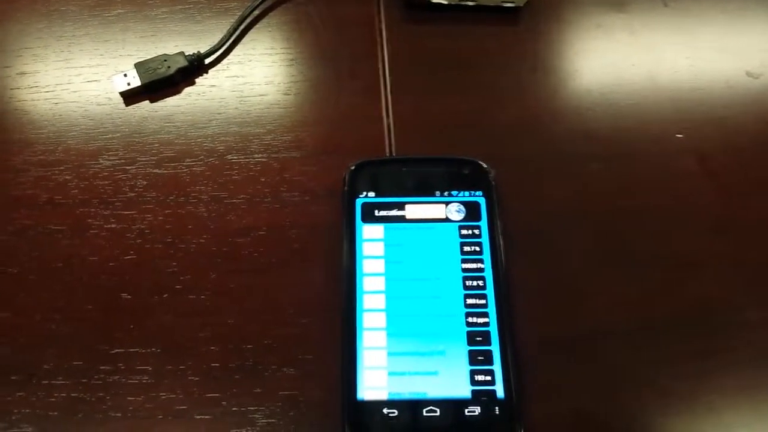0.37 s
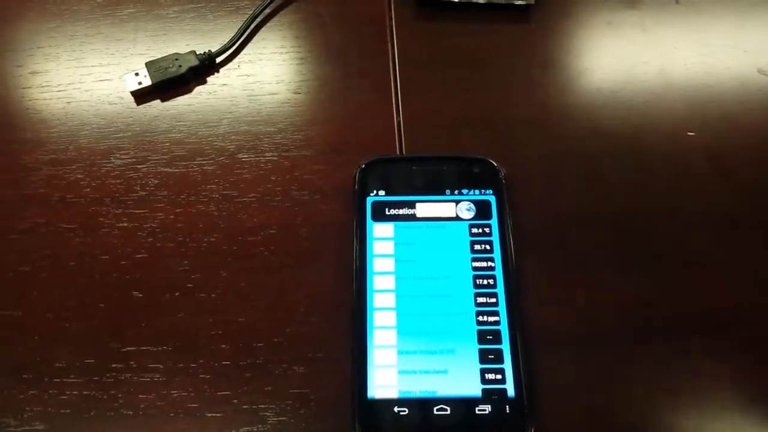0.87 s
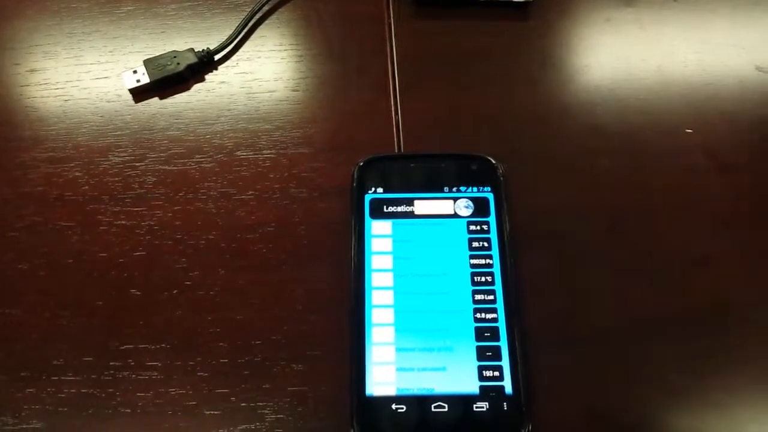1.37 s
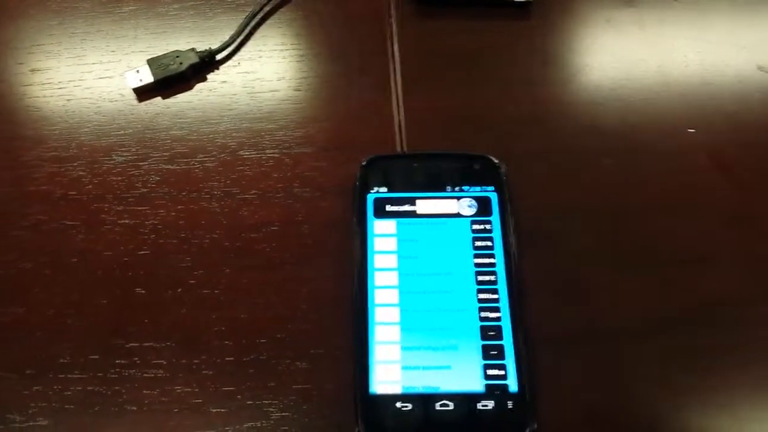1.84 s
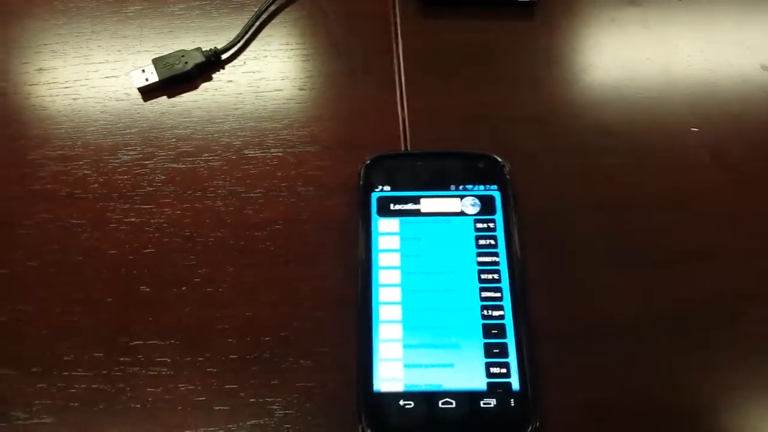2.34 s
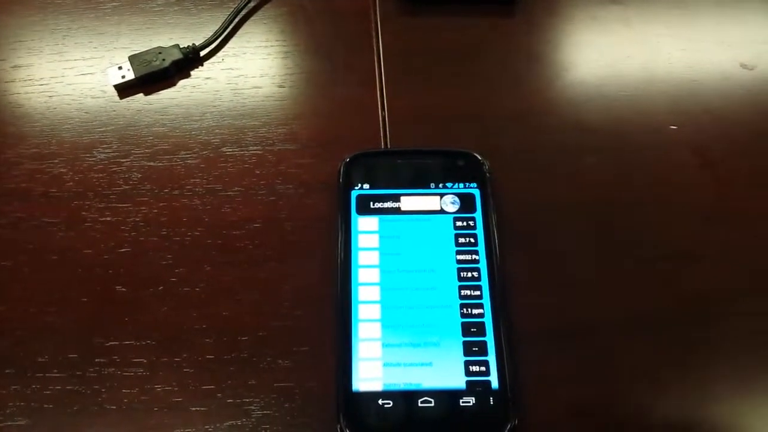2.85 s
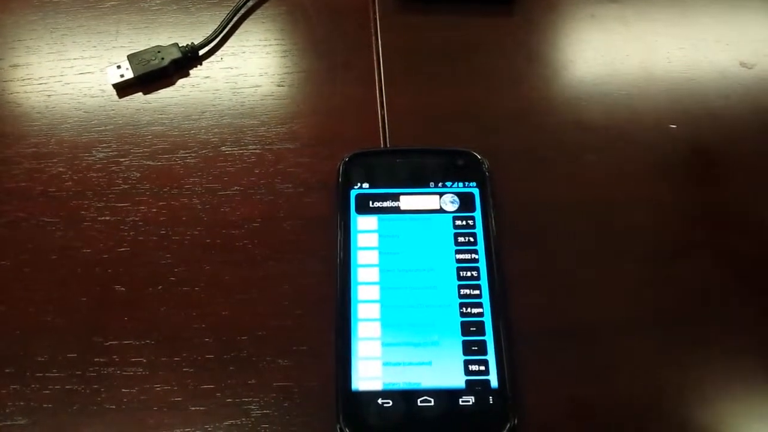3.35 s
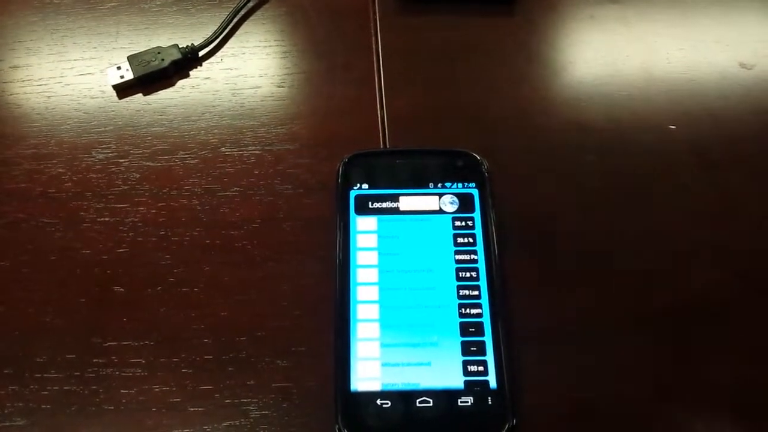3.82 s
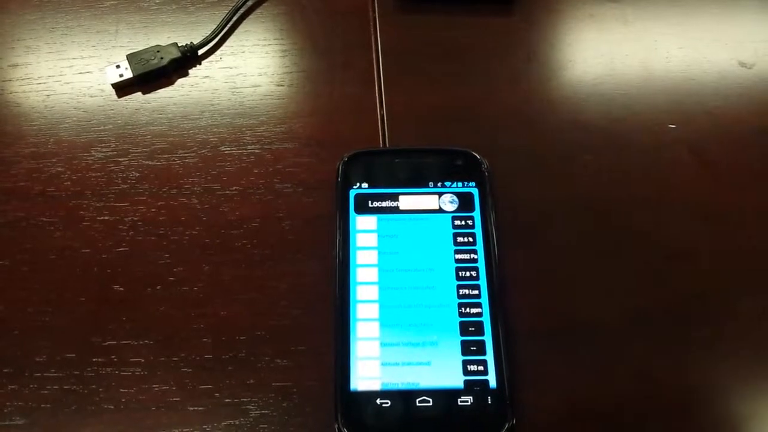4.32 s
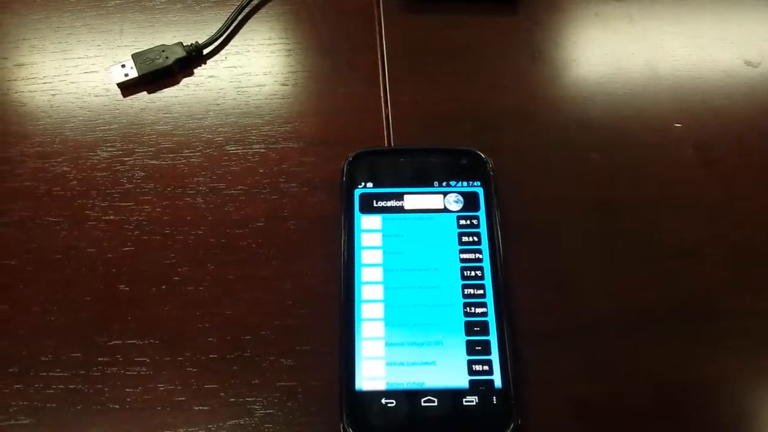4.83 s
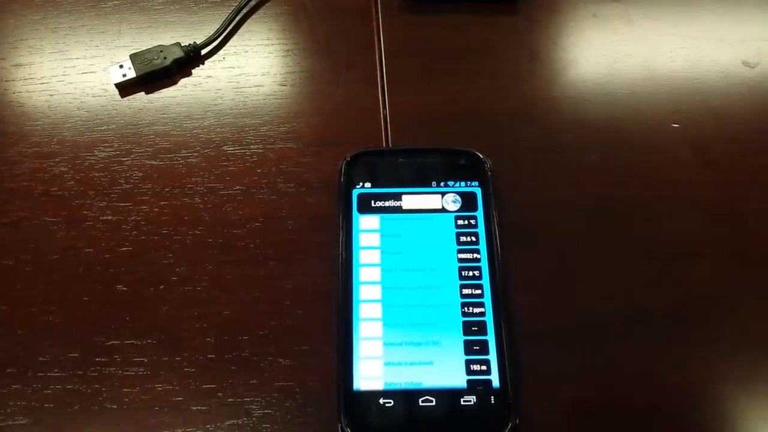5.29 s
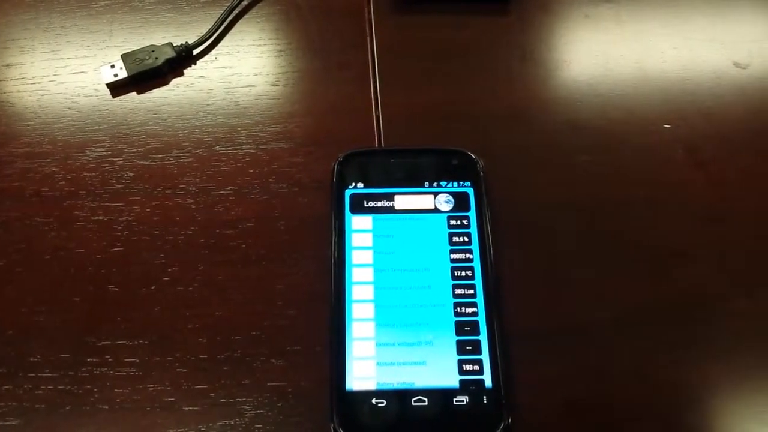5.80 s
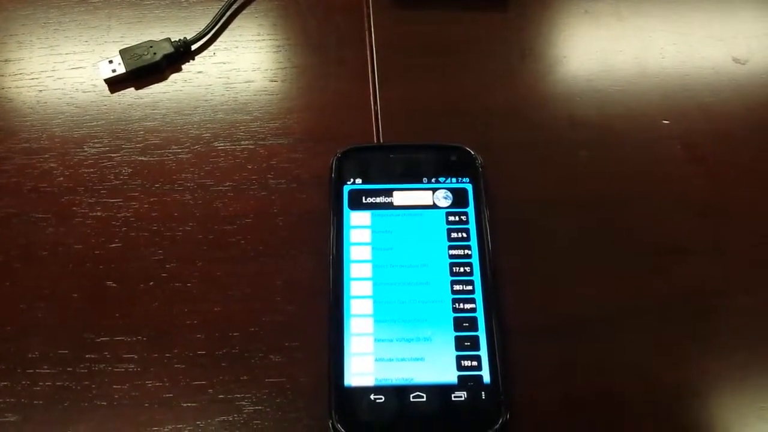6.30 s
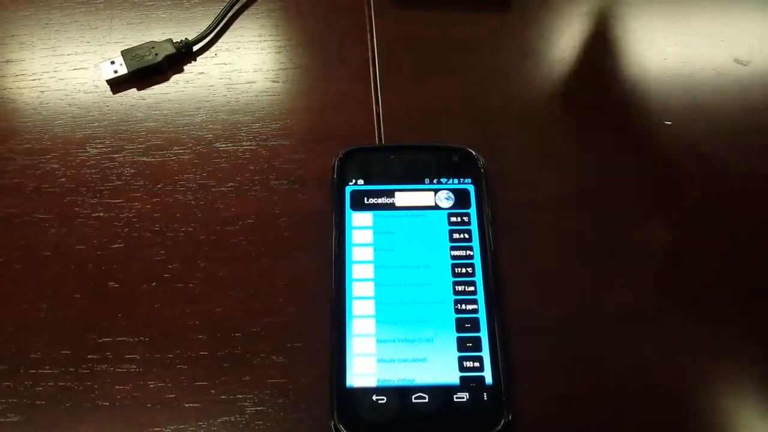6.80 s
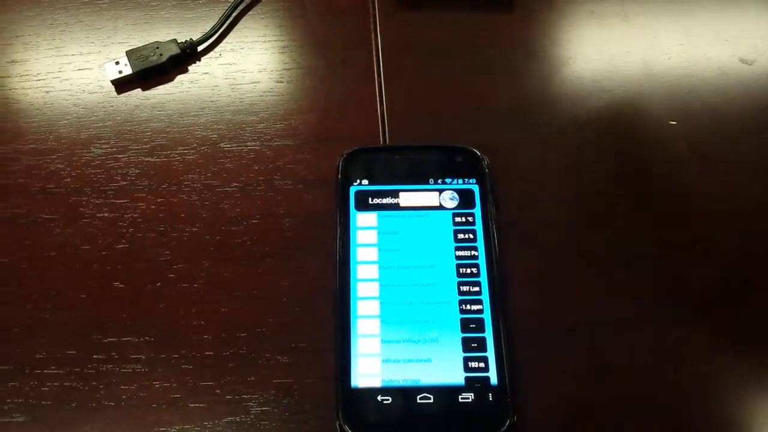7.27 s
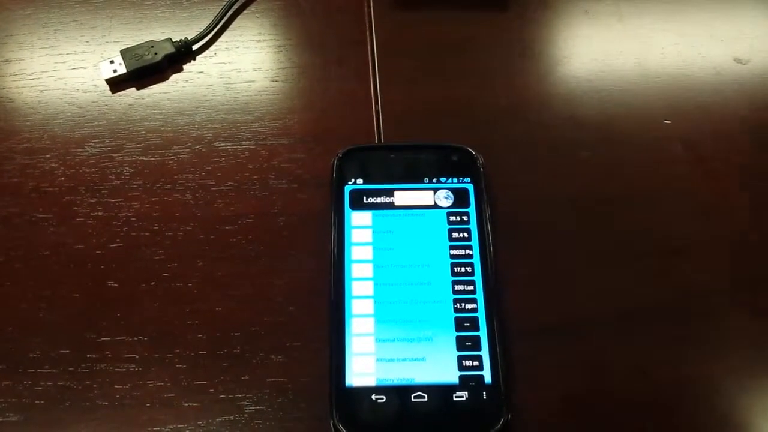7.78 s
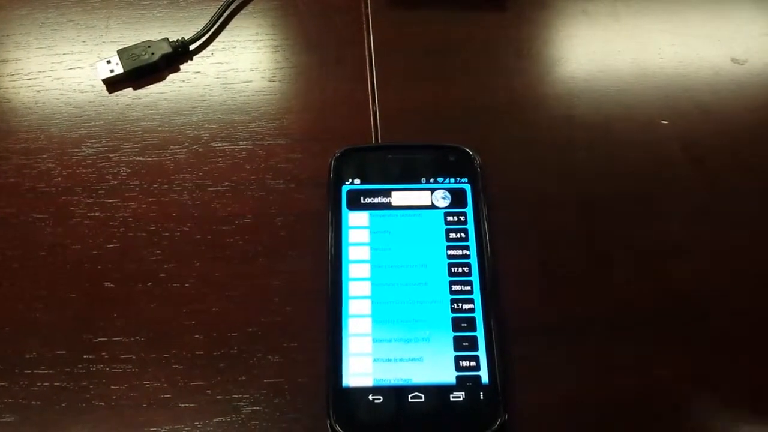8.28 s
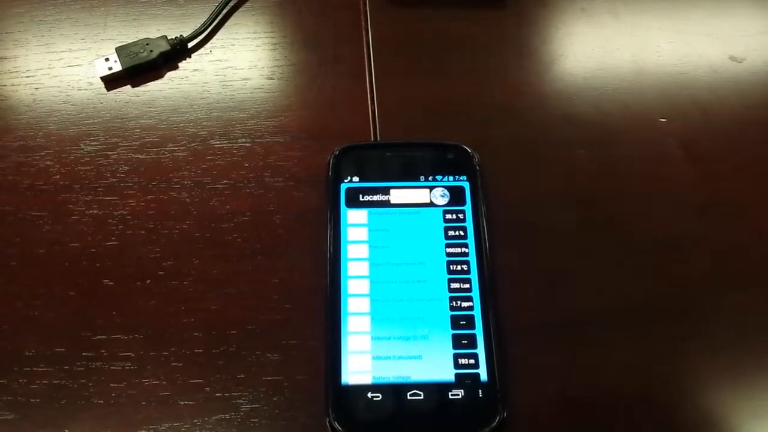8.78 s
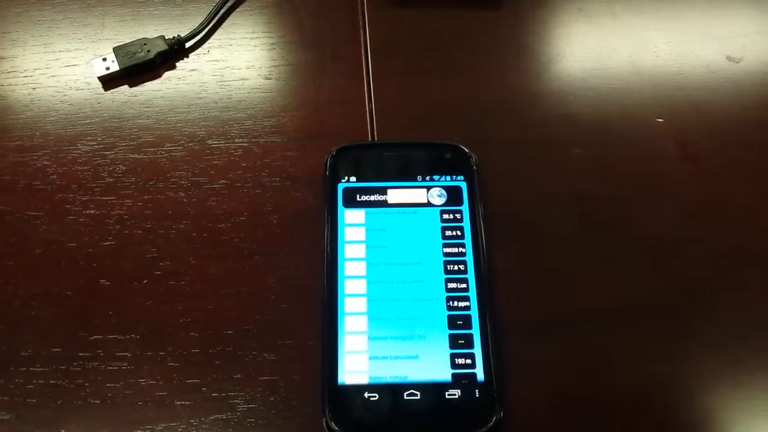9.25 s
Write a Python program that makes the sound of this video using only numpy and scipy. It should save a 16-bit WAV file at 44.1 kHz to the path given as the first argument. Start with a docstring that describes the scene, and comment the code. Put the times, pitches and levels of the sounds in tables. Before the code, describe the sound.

Soft low room tone, then a switch snaps and a small blower spins up into a broad airy roar with a thin whine. The air splashes and honks against a tabletop as the nozzle swings, so its colour keeps changing. A click cuts the power and the whir coasts down. This happens three times, close up in stereo and leaning left, with the third wind-down still fading at the end.

```python
"""A quiet room with a low rumble; then a hair dryer near a table is switched on and off three times.
At each start a plastic switch snaps as ringing modes, and the rotor runs up as a hum and a nine-blade whine, two sines.
Air, as coloured noise, roars through the housing and splashes on the table as the nozzle swings; the background sinks.
After each switch-off snap the rotor coasts down under drag and friction, and the room tone returns.
Two spaced microphones hear it, the dryer nearer the left one."""
import sys
import numpy as np
from scipy import signal
from scipy.fft import rfft, irfft, next_fast_len
from scipy.io import wavfile
from scipy.ndimage import uniform_filter1d

SR = 44100
rng = np.random.default_rng(int(sys.argv[2]) if len(sys.argv) > 2 else 0)


def wav_out(sig):
    """Save sig, one row per channel (or a flat mono array), as 16-bit PCM at SR to the path in sys.argv[1]."""
    wavfile.write(sys.argv[1], SR, np.round(np.clip(np.atleast_2d(sig).T, -1, 1) * 32767).astype(np.int16))


def nominal_scale(level):
    """Amplitude ratio for a level in decibels (scalar or array-like)."""
    x = np.asarray(level, float) / 20
    return 10 ** x


N = 424683
RIGHT_LAG_S = .00038   # later arrival at the right microphone


def seconds():
    """Sampling: the time of every sample, in s."""
    return np.arange(N) / SR


def at_hz(points, hz):
    """Logarithmic pitch: a spectrum table is read on a log frequency axis."""
    points = np.array(points)
    return np.interp(np.log(hz), np.log(points[:, 0]), points[:, 1])


def drift(rate_hz):
    """Random modulation: straight lines join random values of spread 1, rate_hz of them a second."""
    knots = rng.standard_normal(int(N / SR * 60))
    return np.interp(seconds() * rate_hz, np.arange(len(knots)), knots)


def grid_hz():
    """Fourier analysis: the frequencies of the noise spectra, at least 1 Hz."""
    return np.maximum(np.fft.rfftfreq(next_fast_len(N), 1 / SR), 1)


def resonance(hz, centre_hz, width_hz):
    """Resonance: a bell curve, 1 at its centre and a half at half its width to either side."""
    return 1 / (1 + (2 * (hz - centre_hz) / width_hz) ** 2)


def humps(peaks, hz):
    """Superposition: the amplitudes of a few resonances add."""
    return sum(nominal_scale(level_db) * resonance(hz, centre_hz, width_hz) for centre_hz, width_hz, level_db in peaks)


def to_pair(x, pan_db):
    """Time and level difference: a point source reaches the right microphone a little later."""
    late = np.interp(np.arange(N) - RIGHT_LAG_S * SR, np.arange(N), x)
    return np.array([x * nominal_scale(pan_db / 2), late * nominal_scale(-pan_db / 2)])


# Likeness of the noise at the two microphones. Each row: frequency in Hz, likeness from 0 to 1.
LIKENESS = [(40, 0.9), (120, 0.94), (300, 1), (700, 1), (1150, 0.55), (1700, 0.65), (2250, 0.43), (3000, 0),
            (6000, 0.1), (9000, 0.2)]
# Balance of the noise. Each row: frequency in Hz, left minus right level in dB.
LEFT_RIGHT = [(60, -4), (120, 3.5), (240, 1.5), (480, 5), (950, 0.5), (1890, 3.5), (3770, 7), (7520, 1.5),
              (15000, -13)]


def pair_noise(gain, hz, lag_s):
    """Spatial coherence: noise of a given spectrum, partly shared by both microphones; their mean has rms 1."""
    size = next_fast_len(N)
    shared, own = rfft(rng.standard_normal((2, size)))
    alike = np.clip(at_hz(LIKENESS, hz), 0, 1)
    tilt = nominal_scale(at_hz(LEFT_RIGHT, hz) / 2)
    right = alike * shared + np.sqrt(1 - alike ** 2) * own
    right = right * np.exp(-2j * np.pi * hz * lag_s)   # later by lag_s
    pair = irfft(gain * np.array([shared * tilt, right / tilt]), size)[:, :N]
    return pair / np.std(pair.mean(axis=0))


# Drive periods of the motor. Each row: switched on in seconds, switched off in seconds.
POWER = [(.606, 1.712), (3.266, 4.657), (6.616, 8.312)]
# Run-up as two exponential parts. Each row: share of full speed, time constant in seconds.
SPIN_UP = [(.45, .089), (.55, .189)]
FULL_SPEED_HZ = 287.0   # shaft turns per s
DRAG_PER_S, FRICTION_HZ_PER_S = 1.6, 30   # air drag and bearing friction while coasting


def speed():
    """Rotor dynamics: shaft turns per s rise towards full speed, then drag and friction slow them."""
    t, turns_hz = seconds(), 0
    for on, off in POWER:
        driven = np.clip(t, on, off) - on
        coasting = np.maximum(t - off, 0)
        missing = sum(share * np.exp(-driven / tau) for share, tau in SPIN_UP)
        reached = FULL_SPEED_HZ * (1 - missing)
        slowed = reached / (1 + DRAG_PER_S * coasting) - FRICTION_HZ_PER_S * coasting
        turns_hz = np.maximum(slowed, turns_hz)
    return np.maximum(turns_hz, 0)


def slowing():
    """Level of a ratio: speed against full speed in dB, with the speed held to at least 3 Hz."""
    return 20 * np.log10(np.maximum(speed(), 3) / FULL_SPEED_HZ)


# Course of level and aim. Each row: time in seconds, level as heard in dB on top of speed and aim,
# aim of the nozzle (0 = away, 1 = at the table).
LEVEL_AND_AIM = [(0.65, 0.5, 0.45), (0.8, 3.5, 0.52), (0.95, 0, 0.86), (1.15, -0.5, 1), (1.5, -1.5, 0.75),
                 (1.7, -1, 0.47), (2.0, 2, 0.31), (2.35, 1.5, 0.26), (2.7, 1, 0.53), (3.24, 2, 0.77),
                 (3.3, 8, 0.44), (3.5, 4, 0.67), (3.82, 0.5, 1), (4.12, 0, 0.66), (4.48, -0.0, 0.43),
                 (4.65, -1.0, 0.52), (5.0, -3, 0.18), (5.2, -3, 0.34), (5.34, -8, 0.12), (5.9, -1, 0.62),
                 (6.3, 1, 0.83), (6.58, -0.5, 1), (6.65, 4, 0.42), (6.85, 3, 0.43), (7.0, 2.0, 0.72),
                 (7.18, 1.5, 1), (7.42, 0.5, 0.68), (7.76, 1, 0.53), (8.05, 1, 0.84), (8.3, -1, 1),
                 (8.5, 3.5, 0.83), (8.65, 2.5, 0.39), (8.95, 2, 0.084), (9.3, 1, 0.52), (9.63, 0, 0.5)]


def level_and_aim():
    """Linear interpolation: level as heard in dB, on top of speed and aim, and the aim at every sample."""
    s, heard_db, aim = np.transpose(LEVEL_AND_AIM)
    return np.interp(seconds(), s, heard_db), np.interp(seconds(), s, aim)


def sinking():
    """First-order lag: how far the background sinks while the dryer is loud, 0 to 1, trails speed and aim."""
    keep = np.exp(-1 / (.1 * SR))   # lag of 0.1 s
    loudness = nominal_scale(5.0 * slowing()) * (.35 + .6 * level_and_aim()[1])
    return signal.lfilter([1 - keep], [1, -keep], loudness)


# Colour of the room tone and rumble. Each row: frequency in Hz, relative density in dB per Hz.
ROOM = [(12, -34), (20, -23), (60, -10), (101, -9), (116, -3), (171, -1.5), (245, -12), (642, -26),
        (1240, -31), (1500, -29), (2280, -37.5), (12200, -40), (14400, -33)]
ROOM_DB, TONE_SINKS_DB = -48, -6.5   # at rest; change at a sinking of 1
RUMBLE_DB, RUMBLE_SINKS_DB = -58.5, -21   # the same for the rumble


def room():
    """Ambient noise: tone and rumble sink while the dryer is loud; the rumble also dips with the level as heard."""
    hz, sunk = grid_hz(), sinking()
    colour = nominal_scale(at_hz(ROOM, hz)) / np.sqrt(1 + (hz / 14500) ** 60)
    above = 1 / np.sqrt(1 + (75 / hz) ** 8)   # the tone lies above 75 Hz, the rumble below
    below = np.sqrt(1 - above ** 2)
    tone_db = ROOM_DB + TONE_SINKS_DB * sunk + 1.5 * drift(3.0)
    tone = nominal_scale(tone_db) * pair_noise(above * colour, hz, .0001)
    dip_db = 1.2 * np.minimum(level_and_aim()[0], 0)
    rumble_db = RUMBLE_DB + RUMBLE_SINKS_DB * sunk + dip_db + 2.2 * drift(9.2)
    rumble = nominal_scale(rumble_db) * pair_noise(below * colour, hz, 0)
    # left raised by 2.8 dB against right, so the rumble leans less to the right
    return tone + nominal_scale([[1.4], [-1.4]]) * rumble


def walls(x):
    """Diffuse reverberation: a decaying noise tail of unit energy, unrelated at the two microphones."""
    t = np.arange(int(SR / 2)) / SR
    tail = rng.standard_normal((2, len(t))) * nominal_scale(-60 * t / .3) * (t > .003)   # 60 dB in 0.3 s
    tail = tail / np.sqrt(np.sum(tail ** 2, axis=1, keepdims=True))
    return signal.fftconvolve(x, tail, axes=1)[:, :N]


# Snaps of switch and handling. Each row: time in seconds, level in dB (9 dB under the peak before panning),
# left minus right in dB, weight of the modes below 3 kHz in dB, frequency in Hz of the high modes struck hardest.
SNAPS = [(0.5863, -10, 0, -10, 7000), (0.5974, -23, -1, -4, 5000), (0.6128, -11, 8.5, -36, 5800),
         (1.7135, -10, 2, -6, 4300), (3.095, -42, 3, 5, 6000), (3.159, -39, 2.5, 24, 3500),
         (3.246, -7.5, 5, -33, 6800), (3.2783, -27, -1, 11, 5520), (3.2828, -20, -5, -17, 6350),
         (3.2874, -23.5, 21, -21, 4970), (4.6594, -11, -1, -12, 5180), (6.0183, -32, 4, 3, 5600),
         (6.4294, -53, 2.5, 18, 6150), (6.5962, -11.5, 1, -26, 5800), (6.6317, -17, 0, -24, 6260),
         (6.635, -21, 17, -24, 4010), (8.344, -10, 3, -14, 4800)]
# Modes of the plastic switch. Each row: frequency in Hz, level in dB, 60 dB decay time in seconds.
SWITCH_MODES = [(600, -19, .015), (1000, -17, .01), (1450, -7, .008), (2250, -1, .014), (2700, -10, .005),
                (3400, -6, .004), (4200, -3, .004), (5100, -3, .004), (6090, -1, .006), (7150, -1, .006),
                (8300, -8, .004), (9900, -12, .004), (11800, -17, .003), (14000, -19, .003)]
CHATTER_MS = .85   # decay time constant


def switch():
    """Modal excitation: each snap is a few ms of chatter that rings the modes of the plastic."""
    t = np.arange(int(SR / 10)) / SR
    lag = round(RIGHT_LAG_S * SR)
    highpass = signal.butter(2, 400, "high", fs=SR, output="sos")
    out = np.zeros((2, N + len(t)))
    for s, level_db, pan_db, low_db, struck_hz in SNAPS:
        contact = (1 - np.exp(-t / .0003)) * np.exp(-1000 * t / CHATTER_MS)
        chatter = rng.standard_normal(len(t)) * contact
        body = np.zeros(len(t))
        for hz, mode_db, t60 in SWITCH_MODES:
            favoured_db = low_db if hz < 3000 else 8.0 / (1 + ((hz - struck_hz) / 1500) ** 2)
            gain = nominal_scale(mode_db + 2 * rng.standard_normal() + favoured_db)
            body += gain * nominal_scale(-60 * t / t60) * np.sin(2 * np.pi * hz * t)
        snap = signal.fftconvolve(chatter, body)[:len(t)]
        snap = signal.sosfilt(highpass, snap)
        snap = nominal_scale(level_db + 9) * snap / np.abs(snap).max()
        at = round((s - .0003) * SR)   # ahead by the rise time of the chatter
        out[0, at:at + len(t)] += snap * nominal_scale(pan_db / 2)
        out[1, at + lag:at + lag + len(t)] += snap * nominal_scale(-pan_db / 2)
    direct = out[:, :N]
    return direct + nominal_scale(-17) * walls(direct)


# Parts of the air noise: housing roar, splash on the table, duct, grille hiss, fine hiss, topmost hiss,
# then hollow ring and honk. Each row: stream level in dB at full speed and aim 0, power of the speed it follows,
# gain in dB at aim 1, level of the faint rotor rush in dB at full speed.
AIR_PARTS = [(-23.5, 1.53, -9.5, -62), (-36.5, 2.4, 10, -70), (-31, 2.93, 6.5, -43), (-26, 3.3, -0.2, -35),
             (-31.5, 3.7, 8, -46.5), (-37.5, 1.47, 6, -53), (-13, 3.7, -22.5, -56), (-49, 2.38, 26, -66)]
RUSH_POWER = 1.057   # the rush fades slowly with the speed


def air_levels():
    """Power laws of flow noise: each part follows speed, aim and level as heard; the rush outlasts the stream."""
    heard_db, aim = level_and_aim()
    slow_db = slowing()
    levels_db = []
    for stream_db, power, aim_db, rush_db in AIR_PARTS:
        stream = nominal_scale(stream_db + power * slow_db + aim_db * aim)
        rush = nominal_scale(rush_db + RUSH_POWER * slow_db)
        levels_db.append(heard_db + 20 * np.log10(np.hypot(stream, rush)))
    return levels_db


# Broad colour of the air noise. Each row: frequency in Hz, relative density in dB per Hz.
AIR_COLOUR = [(35, -57), (60, -28), (112, -7.5), (229, -2.5), (276, -3.5), (428, -6.5), (491, -3),
              (2470, -18), (4210, -19.5), (6090, -11), (10400, -24), (12500, -32), (14200, -53.5),
              (15300, -90)]
# Resonances of housing, duct and grille. Each row: frequency in Hz, width in Hz, dB above the broad noise.
RESONANCES = [(357, 200, 10.5), (555, 190, 10), (675, 7.7, 6.5), (1122, 100, 3.5), (1343, 410, 5),
              (4300, 450, 2.5), (7330, 610, 2), (9870, 150, 6.5)]
# Frequencies in Hz where the six broad parts of the air noise meet, with the outer limits.
AIR_EDGES_HZ = [40, 900, 1800, 3300, 6500, 9000, 16000]
# Lags in ms of the six parts at the right microphone.
AIR_LAGS_MS = [0.32, 0.24, .38, 0.371, 0.368, 0.36]


def turbulence(parts_db, hz):
    """Turbulent flow: noise coloured by resonances, in six bands that flutter partly on their own."""
    colour_db = at_hz(AIR_COLOUR, hz)
    for centre_hz, width_hz, peak_db in RESONANCES:
        colour_db = colour_db + peak_db * resonance(hz, centre_hz, width_hz)
    gust = drift(14.0)   # shared by all bands
    out = 0
    for low, high, level_db, lag_ms in zip(AIR_EDGES_HZ, AIR_EDGES_HZ[1:], parts_db, AIR_LAGS_MS):
        band = 1 / np.sqrt((1 + (low / hz) ** 12) * (1 + (hz / high) ** 12))
        flutter_db = 0.9 * gust + 1.0 * drift(30.0) + 1.3 * drift(5.0)
        out = out + nominal_scale(level_db + flutter_db) * pair_noise(band * nominal_scale(colour_db), hz, lag_ms / 1000)
    return out


# Hollow ring. Each row: frequency in Hz, width in Hz, relative level in dB.
RING = [(666, 112, -6.5), (2250, 334, -6), (5800, 320, -18)]


def hollow_ring(level_db, hz):
    """Resonant filtering: wide resonances turn noise into a hollow ring."""
    return nominal_scale(level_db + 1.4 * drift(18.0)) * pair_noise(humps(RING, hz), hz, RIGHT_LAG_S)


# Honk between nozzle and table. Each row: frequency in Hz, width in Hz, relative level in dB.
HONK = [(1137, 164, 2), (1540, 320, 2), (842, 60, -5.5)]


def table_honk(level_db, hz):
    """Resonant filtering: the space between nozzle and table makes noise honk."""
    return nominal_scale(level_db + 2.2 * drift(11.0)) * pair_noise(humps(HONK, hz), hz, AIR_LAGS_MS[1] / 1000)


# Grille whistle: frequency in Hz, width in Hz, level in dB against the grille hiss at full speed.
WHISTLE = (5960, 220, -7)


def grille_whistle(hiss_db, hz):
    """Flow-excited resonance: a narrow band of noise that needs a fast stream."""
    centre_hz, width_hz, whistle_db = WHISTLE
    level_db = hiss_db + whistle_db + 1.8 * slowing() + 2.2 * drift(8.5)
    return nominal_scale(level_db) * pair_noise(resonance(hz, centre_hz, width_hz), hz, RIGHT_LAG_S)


def faint_echo(x):
    """Comb filtering: the delay of a faint echo wanders at random, so notches drift through the noise."""
    delay = SR * (.0011 + .00012 * uniform_filter1d(drift(1.6), size=8000))
    echo = [np.interp(np.arange(N) - delay, np.arange(N), side) for side in x]
    return x + 0.15 * np.array(echo)


# Brief dip of the air noise just before the last switch-off snap: time in seconds, half width in seconds, change in dB.
DIP = (8.332, .017, -7.5)


def air():
    """Superposition: turbulence, ring, honk and whistle add up and gain a faint echo."""
    hz = grid_hz()
    *parts_db, ring_db, honk_db = air_levels()
    stream = turbulence(parts_db, hz) + hollow_ring(ring_db, hz) + table_honk(honk_db, hz)
    stream = stream + grille_whistle(parts_db[3], hz)
    started = seconds() > POWER[0][0]   # silent until first switched on
    dip_s, half_width_s, change_db = DIP
    dip_db = change_db * np.exp(-((seconds() - dip_s) / half_width_s) ** 2)
    return faint_echo(stream * started * nominal_scale(dip_db))


# Unbalance hum as the housing passes it on. Each row: shaft speed in Hz, level in dB.
HUM = [(70, -58), (130, -51.5), (172, -37.5), (215, -44), (262, -39), (287, -32)]


def hum_level():
    """Forced vibration: the hum follows the housing's response at shaft speed, the level as heard and the aim."""
    heard_db, aim = level_and_aim()
    return heard_db + at_hz(HUM, np.maximum(speed(), 1)) - 3 * aim


# The whine swells as the intake turns towards the microphones. Each row: time in seconds,
# half width in seconds, gain in dB.
WHINE_SWELLS = [(.79, .08, -3), (1.38, 0.081, 7), (3.6, 0.36, 3.5), (4.0, 0.24, 8), (7.22, 0.34, 7),
                (8.05, 0.24, 10.5)]
WHINE_DB, WHINE_POWER = -36, 2.1   # at full speed; power of the speed
WHINE_COASTING_DB = -7   # change once the drive is off


def whine_level():
    """Blade loading and directivity: the whine follows speed, drive and the swells of the intake."""
    t = seconds()
    powered = sum((t > on) & (t < off) for on, off in POWER) * 1.
    driven = uniform_filter1d(powered, size=3000)
    swell_db = sum(gain_db * np.exp(-((t - s) / width_s) ** 2) for s, width_s, gain_db in WHINE_SWELLS)
    return WHINE_DB + WHINE_POWER * slowing() + WHINE_COASTING_DB * (1 - driven) + swell_db


BLADES = 9


def rotor():
    """Blade-passing frequency: a sine at shaft speed and one at blade rate, both wavering a little."""
    turns = np.cumsum(speed() * (1 + 0.00045 * drift(25.87))) / SR
    hum_rms = nominal_scale(hum_level() + 0.5 * drift(8.5))
    hum = hum_rms * np.sqrt(2) * np.sin(2 * np.pi * turns)
    whine_rms = nominal_scale(whine_level() + 3.3 * drift(21.0))
    whine = whine_rms * np.sqrt(2) * np.sin(2 * np.pi * BLADES * turns)
    return (to_pair(hum, 3.5) + to_pair(whine, 7.0)) * (turns > 0)


def scene():
    """Superposition: room, switch, air and rotor add at the microphones."""
    return room() + switch() + air() + rotor()


def low_pass(x):
    """Removes everything above the highest recorded frequency."""
    return signal.sosfilt(signal.butter(12, 15720, fs=SR, output="sos"), x)


def record(dry):
    """Band limit and overload: the microphones fade above 15 kHz, the converter clips at full scale."""
    heard = signal.sosfilt(signal.butter(8, 15000, fs=SR, output="sos"), dry)
    mix = np.clip(heard, -1, 1)
    return low_pass(mix)


dry = scene()
out = record(dry)
wav_out(out)
```